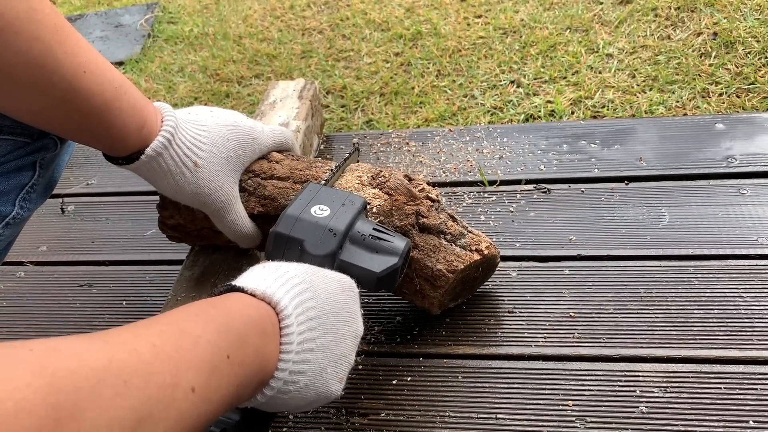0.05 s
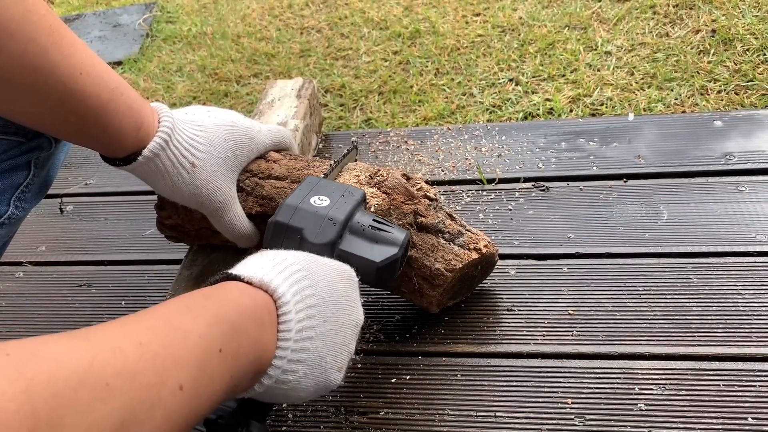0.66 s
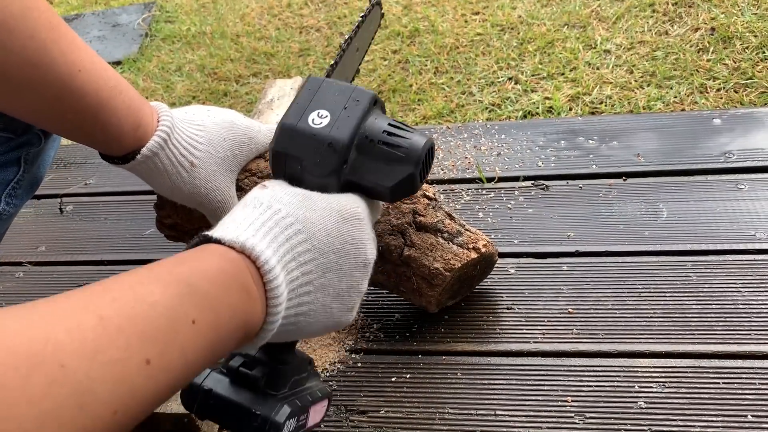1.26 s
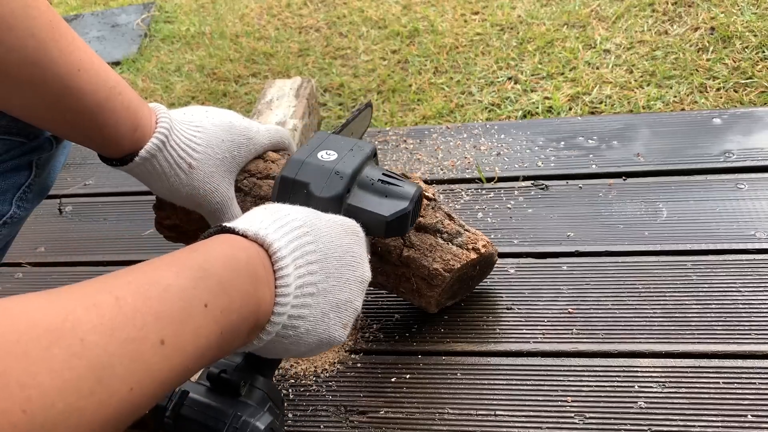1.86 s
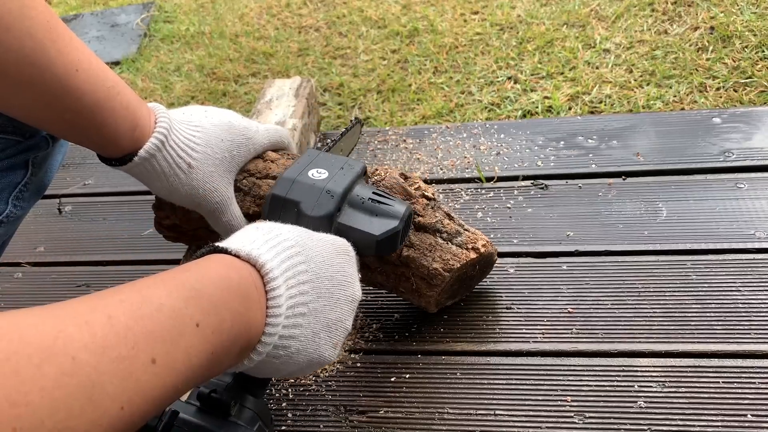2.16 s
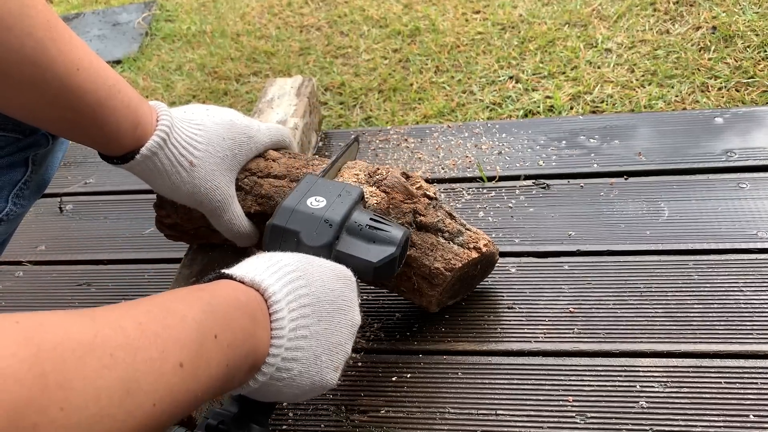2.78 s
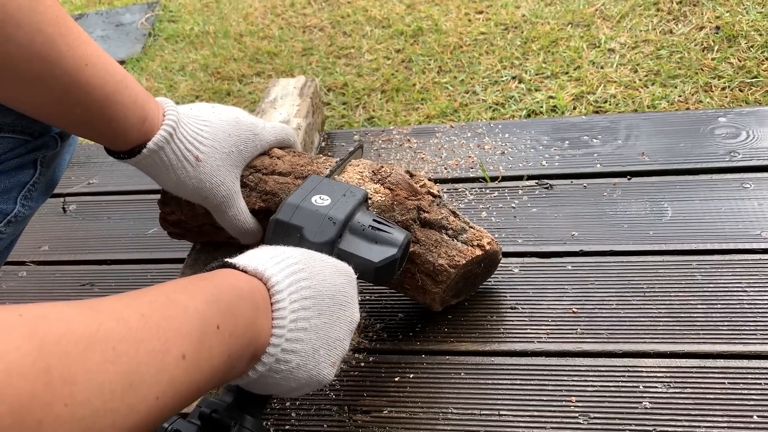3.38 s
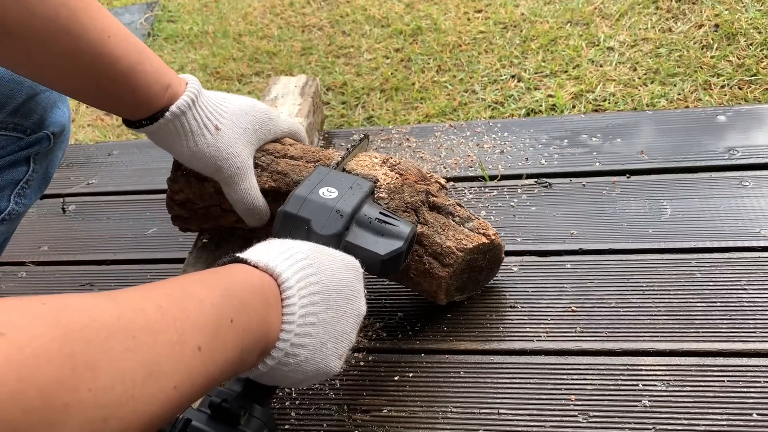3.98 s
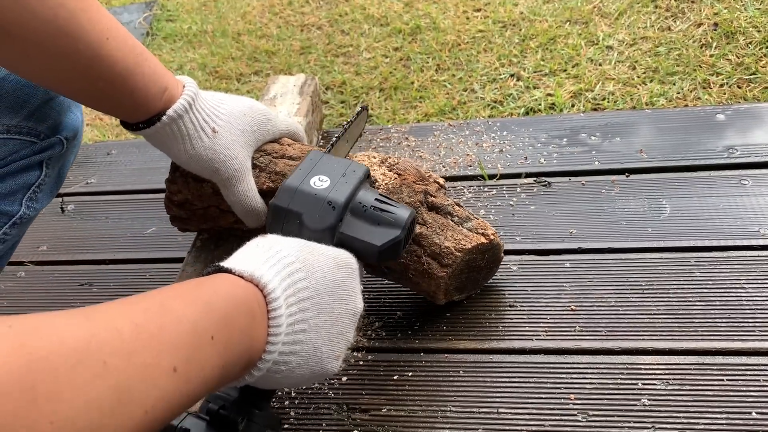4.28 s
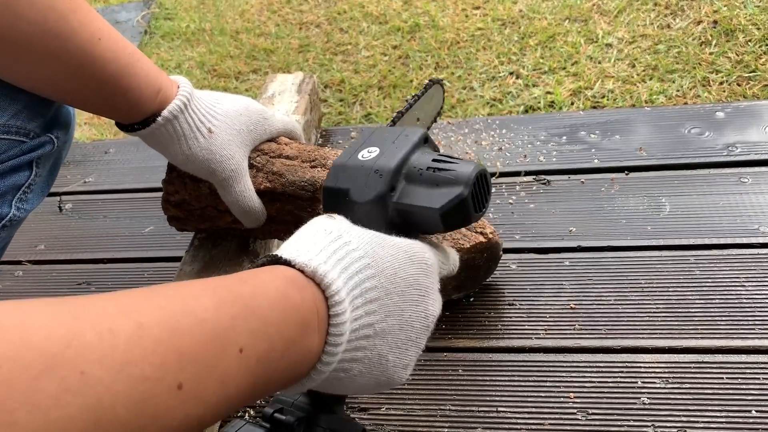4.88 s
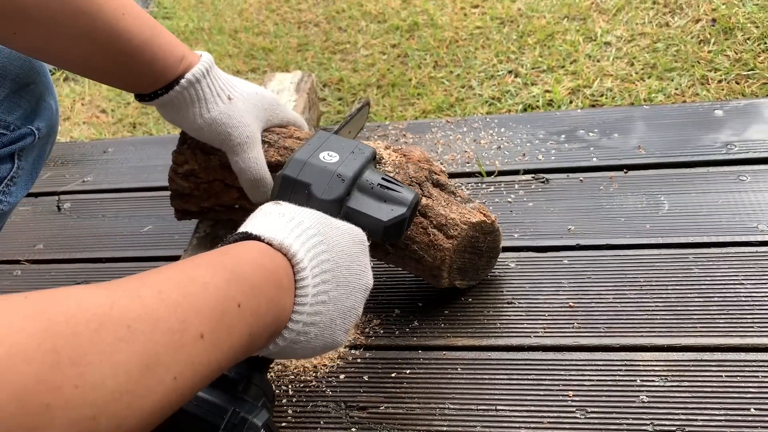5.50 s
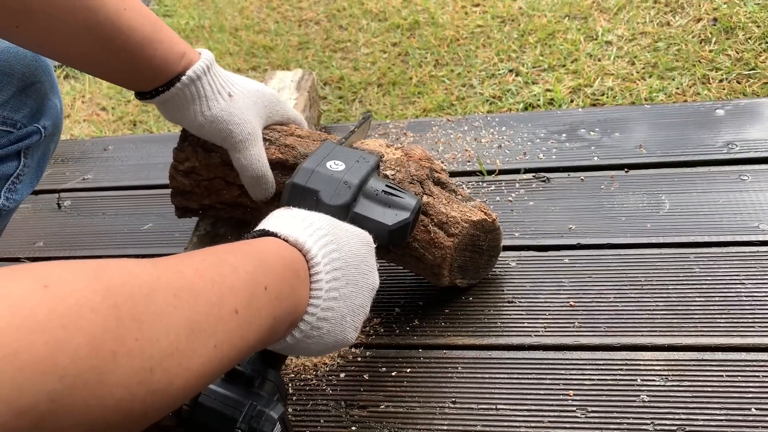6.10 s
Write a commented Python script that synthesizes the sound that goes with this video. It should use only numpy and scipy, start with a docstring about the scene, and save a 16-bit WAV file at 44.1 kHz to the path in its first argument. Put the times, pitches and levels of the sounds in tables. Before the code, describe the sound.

A small battery chainsaw whines and rattles through three short bursts against a log, with light ticks and knocks between.

```python
"""Light ticks and dull knocks come first: a stopped chain touches the bark, a log rocks on a wooden deck.
Then a small battery chainsaw runs in three short bursts. Its gears whine and the chain rattles round
the bar; when the cutters bite, the motor sags and the log drums. Between bursts, more ticks and scuffs.
Outdoors, close to the log, on a two-port stereo microphone, with a faint rumble far off."""
import sys
import numpy as np
from scipy import signal
from scipy.fft import rfft, irfft, next_fast_len
from scipy.io import wavfile
from scipy.ndimage import uniform_filter1d

SR = 44100
rng = np.random.default_rng(int(sys.argv[2]) if len(sys.argv) > 2 else 0)


def int16_out(signal):
    """Quantize to a 16-bit WAV file."""
    q = np.round(np.clip(np.atleast_2d(signal).T, -1, 1) * 32767)
    wavfile.write(sys.argv[1], SR, q.astype(np.int16))


N = 271038
T = np.arange(N) / SR

# trigger pulls: pull t/s, release t/s, drive level/dB, log contact level/dB, slack chain clack level/dB
BURSTS = [(1.516, 2.039, -2, -70.5, -35), (2.399, 3.921, 1, -40.5, -39), (5.377, 6.138, -0.5, -40.5, -31.5)]
# the drive's answer to each pull: spin-up time constant/s, gear whine trim/dB, chain ring trim/dB
SPIN_UPS = [(.067, .5, 1.5), (.096, -1, -3), (.078, 0, 1.5)]
# drag on the motor, one curve per burst: t/s, share of speed lost
MOTOR_DRAG = [
    [(1.72, 0), (1.8, .205), (1.825, .23), (1.865, .38), (1.915, .41), (2, .68), (2.035, .77)],
    [(2.85, .02), (2.91, .29), (3, .55), (3.09, .7), (3.13, .635), (3.2, .625), (3.32, .55), (3.42, .52),
     (3.5, .42), (3.55, .38), (3.6, .28), (3.73, .245), (3.86, .31), (3.93, .55)],
    [(5.75, 0), (5.86, .28), (5.99, .245), (6.05, .26), (6.085, .32), (6.14, .28)],
]
# cutters snag in the wood: t/s, crunch level/dB, snap level/dB, log jolt level/dB
SNAGS = [(2.855, -22, -26, -21.5), (2.867, -24.5, -31, -16.5), (2.9, -23.5, -38.5, -28),
         (3.602, -24, -40, -29.5), (3.761, -22, -28, -19), (3.802, -26.5, -40, -29.5),
         (3.823, -30, -35, -24.5), (3.853, -25.5, -47, -29), (3.872, -24, -40, -16.5),
         (3.901, -21.5, -46, -21), (3.921, -30, -46, -29.5), (5.409, -34.5, -39.5, -31),
         (5.778, -18.5, -25, -15), (5.811, -24.5, -28, -16.5), (5.84, -21.5, -28.5, -22),
         (5.872, -22.5, -55, -21), (5.931, -29, -41, -26.5), (5.955, -29.5, -53, -23),
         (6.003, -27, -48, -25), (6.047, -25, -59, -42), (6.114, -29, -44, -29)]
# dry links chirp in the groove: t/s, level/dB
CHIRPS = [(2.497, -30), (2.588, -30), (2.755, -35)]
# the stopped chain touches the bark, then the bar drops into the cut:
# t/s, click level/dB, bright edge level/dB, drop delay/s, hollow ring level/dB
TOUCHES = [(.005, -44.5, -57, .022, -49), (0.225, -44.5, -73, 0.018, -54), (.307, -45, -61, 0.027, -49),
           (.498, -45.5, -65, .018, -58), (.565, -44, -54.5, .022, -47.5), (.683, -56, -80, 0.0089, -76),
           (0.751, -62, -58, 0.015, -84), (0.777, -50, -68, 0.019, -67), (1.394, -51.5, -74, 0.01, -72),
           (2.127, -60, -70, 0.0088, -89), (2.268, -50, -61, 0.017, -82), (2.35, -43.5, -59, 0.0032, -45.5),
           (4.403, -45, -76, .023, -62), (4.534, -40.5, -78, 0.018, -69), (4.555, -48, -59, .027, -54),
           (4.749, -44.5, -80, 0.026, -71), (4.96, -49, -82, 0.0089, -71), (5.002, -58.5, -72, .01, -83)]
# the log rocks on the deck: t/s, level/dB, f/Hz, t60/s
KNOCKS = [(0.264, -37, 168, 0.12), (1.151, -40, 146, 0.093), (2.041, -45.5, 182, 0.11),
          (2.192, -39.5, 188.7, 0.035), (2.353, -29.5, 187, 0.043), (2.945, -23.5, 212, 0.07),
          (3.95, -37, 163, 0.14), (4.343, -42.5, 212, 0.093), (5.57, -29, 187.6, 0.059)]
# the bar scuffs along the cut: t/s, length/s, level/dB
SCUFFS = [(1.161, 0.032, -58.5), (1.239, 0.029, -75), (2.344, .045, -66.5), (4.26, 0.032, -60)]

# spectra and filter curves: f/Hz, level/dB
RATTLE_SPECTRUM = [(150, -33.5), (300, -12.5), (560, -4), (900, -6), (1250, -5.5), (1550, -5), (2300, -5),
                   (3200, 0.5), (4200, -4.5), (5200, -17), (7000, -15.5), (10000, -33.5)]  # links in the groove
HISS_SPECTRUM = [(2500, -30), (4500, -4), (5300, -3), (6300, -1), (7500, -1), (9500, 0), (13000, -.5),
                 (14700, -4), (15700, -9)]  # bright steel contacts
BITE_SPECTRUM = [(120, -4.5), (250, -6.5), (400, -3), (560, 2), (1200, -1), (1550, -5), (1950, -0.5),
                 (3000, -13), (5000, -21), (14000, -20)]  # tearing wood
TICK_SPECTRUM = [(300, -11.5), (700, 1.5), (1200, 1), (2000, -1), (3000, 5.5), (5000, -7), (9000, -20),
                 (15000, -40.5)]  # chain on bark
AIR_SPECTRUM = [(15, -23.5), (25, 3.5), (76, -4.5), (248, -18.5), (415, -28.5), (573, -33.5), (751, -37.5),
                (883, -35.5), (1640, -38.5), (2210, -39), (3600, -44.5), (6520, -51), (11500, -61),
                (13500, -56), (15900, -76.5)]  # outdoor background
GEAR_COVER = [(3600, 0), (4100, -1.5), (4450, -4.5), (5500, -16)]  # the cover muffles the highest whine
# resonances: f/Hz, width/Hz, level/dB
HOUSING_MODES = [(740, 40, -7.5), (910, 60, -5), (1233, 120, -6.5), (1975, 51, 0.5), (2360, 55, -4),
                 (2690, 160, -3), (3320, 270, -13)]
GEARBOX_MODES = [(1350, 400, -8), (2700, 550, 1), (3330, 400, .5), (3950, 700, -7)]
CHAIN_MODES = [(2775, 150, 1.5), (3640, 320, -10)]
CHIRP_MODES = [(5550, 350, 7), (6030, 500, -10)]
LOG_MODES = [(141.2, 23, -4.5), (175, 32, 1.5), (217.6, 35, 3), (262, 46, -14.5)]
# modes of the tapped bar: f/Hz, level/dB, t60/s
BAR_MODES = [(542.6, 9, 0.021), (647, -11, 0.024), (1140, -4, 0.017)]

# phase between the microphone ports: f/Hz, left lead/rad
PORT_PHASE = [(0, 0), (690, 1.17), (1890, 0.62), (3270, 3.5), (4130, 1.51), (6120, 4.5), (7240, 3.5),
              (8350, 0.5), (10300, 0.5), (11000, -3), (12200, -3.3), (12900, -6.5), (15000, -5.5),
              (15600, -9.5)]
# balance between the ports: f/Hz, left over right/dB
PORT_BALANCE = [(60, 0.5), (400, -2.5), (750, 1), (1250, 3), (1900, -3.5), (3300, -2.5), (5500, -3),
                (7000, 0), (15000, 0)]
# scattered sound, unlike in the two ports: f/Hz, share of power
SCATTER = [(100, .01), (300, .04), (700, 0.29), (2000, 0.38), (3200, 0.2), (4800, 0.9), (7000, 0.38),
           (9000, .04), (11000, .004), (12200, .004), (15000, .04)]

FREE_MESH_HZ, CREEP_MESH_HZ = 4463, 480  # gear teeth meshing: running free, at the first jerk
TEETH_PER_LINK = 48  # gear teeth that mesh while one chain link passes
BRAKE_S, ENGAGE_S = .025, .0073  # time constants: the motor stops, the chain starts to move
RATTLE_DB, RATTLE_DB_PER_OCTAVE = -39, 5  # base gain at free speed, change with speed
HISS_DB, HISS_DB_PER_OCTAVE = -33.5, 9
WHINE_LOAD_DB = 7  # extra whine at full load
SKIM_DB, LOWER_S = -8, .19  # drumming from skimming the bark, against full load; time to lower the bar


def saw():
    """The running saw, close by: chain, gears and cutters are all paced by the motor."""
    mesh_hz, rattle_gain, whine_gain, hiss_gain, cut_gain, ring_gain = motor()
    mesh_hz = mesh_hz * (1 + .005 * drift(45))
    teeth = np.cumsum(mesh_hz) / SR
    rattle, hiss = chain(teeth, mesh_hz)
    tearing, drumming = cutters(teeth)
    # the slack chain slaps the bar and rings in spurts; wood pressing on it damps the ring
    undamped = rattle_gain / (rattle_gain + from_db(8) * cut_gain + 1e-9)
    spurts = from_db(3.3 * drift(50))
    ring = undamped * spurts * even(resonate(grains(500, spread_db=2.5), CHAIN_MODES), window_s=.04)
    drive = from_db(3.5) * rattle_gain * rattle + ring_gain * ring + whine_gain * gears(teeth, mesh_hz)
    surge = from_db(.5 * drift(39.65))  # the slack chain whips, so the noise swells and fades
    cutting = from_db(-5) * tearing + from_db(-1) * drumming
    return surge * (drive + hiss_gain * hiss) + cut_gain * cutting


def motor(coast_t60=.11):
    """Pulls spin the motor up, load drags it down: mesh/Hz, then rattle, whine, hiss, cut, ring gains."""
    mesh_hz, gains = np.full(N, float(CREEP_MESH_HZ)), np.zeros((5, N))
    for burst, (spin_up_s, whine_db, ring_db), drag in zip(BURSTS, SPIN_UPS, MOTOR_DRAG):
        pull, release, db, contact_db, _ = burst
        held, coasting = np.clip(T - pull, 0, release - pull), np.maximum(T - release, 0)
        load = np.clip(np.interp(T, *np.transpose(drag)), 0, .9)
        spun = 1 - np.exp(-held / spin_up_s)
        hz = (CREEP_MESH_HZ + (FREE_MESH_HZ - CREEP_MESH_HZ) * spun) * (1 - load)
        mesh_hz += (hz - CREEP_MESH_HZ) * np.exp(-coasting / BRAKE_S) * (T > pull)
        octaves = np.log2(hz / FREE_MESH_HZ)
        rattle = from_db(db + RATTLE_DB + RATTLE_DB_PER_OCTAVE * octaves)
        whine = rattle * from_db(whine_db + WHINE_LOAD_DB * load)
        hiss = from_db(db + HISS_DB + HISS_DB_PER_OCTAVE * octaves)
        cut = from_db(contact_db) * (from_db(SKIM_DB) * np.clip(held / LOWER_S, 0, 1) ** 2 + load)
        running = (1 - np.exp(-held / ENGAGE_S)) * from_db(-60 * coasting / coast_t60)
        gains += running * np.array([rattle, whine, hiss, cut, rattle * from_db(ring_db)])
    return mesh_hz, *gains


def chain(teeth, mesh_hz, contacts_per_tooth=2.2):
    """Links clatter in the bar groove, harder each time one rounds the sprocket: (rattle, hiss)."""
    throb = from_db(1.7 * np.cos(2 * np.pi * teeth / TEETH_PER_LINK) + .9 * drift(150) + 1.5 * drift(700))
    per_s = contacts_per_tooth * mesh_hz + 1200
    clatter = colour(throb * grains(per_s, spread_db=3), RATTLE_SPECTRUM)
    # each panel of the housing buzzes more or less as the grip and load change
    buzz = sum(from_db(5.1 * drift(45)) * resonate(clatter, [mode]) for mode in HOUSING_MODES)
    hiss = colour(throb * grains(2 * per_s, spread_db=4.5), HISS_SPECTRUM)
    return even(clatter + buzz, window_s=.063), even(hiss, window_s=.051)


def gears(teeth, mesh_hz, rasp_db=-1.5, rasp_spread_hz=597.6):
    """Tooth mesh and its octave sing through the gearbox resonances; backlash rasps around the pitch."""
    phase = 2 * np.pi * teeth + .28 * drift(420) + .5 * drift(80)
    mesh = np.sin(phase) + from_db(-4) * np.sin(2 * phase)
    spurts = rms_one(from_db(2 * drift(55) + 2.2 * drift(240)))
    rasp = from_db(rasp_db) * drift(rasp_spread_hz) * np.sin(phase + drift(rasp_spread_hz))
    # the teeth press harder, and whine louder, while the motor gathers speed
    hz_per_s = uniform_filter1d(np.gradient(mesh_hz) * SR, SR // 20)
    torque = from_db(3.5 * np.clip(hz_per_s / 14000, 0, 1))
    return colour(resonate(mesh * spurts * torque + rasp, GEARBOX_MODES), GEAR_COVER)


def cutters(teeth, spread_db=3, kick_decay_s=.005):
    """Cutters catch unevenly; each tears off a chip and kicks the log: (tearing, drumming)."""
    link = np.floor(teeth / TEETH_PER_LINK + .6 * drift(160))
    kicks = (np.diff(link, prepend=0) != 0) * from_db(spread_db * np.clip(rng.standard_normal(N), -2, 2))
    force = signal.lfilter([1], [1, -np.exp(-1 / (kick_decay_s * SR))], kicks + 1e-18)
    tearing = colour(force * grains(5000, spread_db=5), BITE_SPECTRUM)
    drumming = resonate(force * rng.standard_normal(N), LOG_MODES)
    drumming = colour(drumming, [(60, -19.5), (130, 4.5), (270, 4), (450, -9.5), (900, -24.5)])
    return even(tearing, window_s=.045), even(drumming, window_s=.044)


def snags(jolt_hz=190, jolt_spread=.18):
    """A caught cutter splinters the wood with a crunch and a snap, and jolts the log at a varying pitch."""
    s, crunch_db, snap_db, jolt_db = np.transpose(SNAGS)
    splinters = even(colour(grains(9000, spread_db=1), BITE_SPECTRUM), window_s=.0035)
    crunch = blows(s, crunch_db, rise_s=.002, t60=.028) * splinters
    bright = rms_one(colour(grains(6900, spread_db=0), HISS_SPECTRUM))
    snap = blows(s - .002, snap_db, rise_s=.002, t60=.046) * bright
    pitches = jolt_hz * (1 + jolt_spread * rng.uniform(-1, 1, len(s)))
    jolt = sum(blows([at], [db], rise_s=.01, t60=.054) * np.sin(2 * np.pi * hz * (T - at))
               for at, db, hz in zip(s, jolt_db, pitches))
    return from_db(1.5) * crunch + from_db(3) * snap + jolt


def chirps():
    """Steel slips on steel and squeaks briefly."""
    squeak = even(resonate(rng.standard_normal(N), CHIRP_MODES), window_s=.0049)
    return blows(*np.transpose(CHIRPS), rise_s=.0018, t60=.053) * squeak


def knocks(upper_ratio=1.62, upper_db=-5):
    """The log thuds on the boards: one low mode and a shorter one above it."""
    out = np.zeros(N)
    for s, db, hz, t60 in KNOCKS:
        phase = 2 * np.pi * hz * (T - s)
        out += blows([s], [db], rise_s=.00091, t60=t60) * np.sin(phase)
        out += blows([s], [db + upper_db], rise_s=.0023, t60=.32 * t60) * np.sin(upper_ratio * phase)
    return out


def ticks():
    """A light touch of the chain: woody click, bright steel edge, hollow ring of the bar."""
    s, db, ring_db, edge_db = np.transpose(contacts())
    click = even(colour(grains(9800, spread_db=3.5), TICK_SPECTRUM), window_s=.0093)
    # bark gives way, so each contact swells over a moment
    contact = blows(s - .001, db, rise_s=.003, t60=.024)
    scrape = blows(s - .001, edge_db, rise_s=.002, t60=.024)
    woody = click * (from_db(-2) * contact + from_db(-23.5) * blows(s, db, rise_s=.01, t60=.2))
    edge = from_db(5) * scrape * rms_one(colour(grains(9000, spread_db=13), HISS_SPECTRUM))
    taps = np.zeros(N)
    taps[(np.abs(s) * SR).astype(int)] = from_db(ring_db)
    age = T[:SR // 5]
    bar = sum(from_db(level - 60 * age / t60) * np.sin(2 * np.pi * hz * age)
              for hz, level, t60 in BAR_MODES)
    ring = signal.fftconvolve(taps, bar * (1 - np.exp(-age / .0012)))[:N]
    return woody + edge + from_db(3.5) * ring


def contacts(ring_offset_db=-25.5):
    """Each touch and its softer drop, and a clack for each pull: t/s, click/dB, ring/dB, edge/dB."""
    first = [(s, db, db + ring_offset_db, edge_db) for s, db, edge_db, _, _ in TOUCHES]
    drops = [(s + delay, db - 5, ring_db, edge_db - 7) for s, db, edge_db, delay, ring_db in TOUCHES]
    clacks = [(pull, db, db + ring_offset_db, db - 14.5) for pull, *_, db in BURSTS]
    return first + drops + clacks


def scuffs(touch_drag_s=.02, touch_drag_db=-32.5):
    """Steel drags briefly over bark grains; every touch drags a little too."""
    drags = [(s, touch_drag_s, db + touch_drag_db) for s, db, *_ in TOUCHES]
    swell = sum(from_db(db) * np.exp(-2 * ((T - s) / length) ** 2) for s, length, db in SCUFFS + drags)
    bark = colour(grains(2500, spread_db=10.5), [(300, 3.5), (900, 2), (3000, 3), (7000, 0), (14000, -1.5)])
    return swell * rms_one(bark)


def deck(x, scatter_t60=.039):
    """Direct sound meets the microphone ports out of step; boards, log and hands scatter the rest."""
    age = T[:SR // 10]
    echoes = rng.standard_normal(len(age)) * from_db(-60 * age / scatter_t60)
    size = next_fast_len(N + SR // 5)
    hz = np.arange(size // 2 + 1) * SR / size
    scattered = signal.hilbert(signal.fftconvolve(x, echoes / np.linalg.norm(echoes)), size)[:N]
    shifting = np.real(scattered * np.exp(2j * drift(90)))  # moving hands shift the paths
    share = np.clip(np.interp(hz, *np.transpose(SCATTER)), 0, 1) / 2
    mid, side = np.sqrt(1 - share) * rfft(x, size), np.sqrt(share) * rfft(shifting, size)
    balance = from_db(np.interp(hz, *np.transpose(PORT_BALANCE)) / 2)
    lead = balance * np.exp(.5j * np.interp(hz, *np.transpose(PORT_PHASE)))
    return irfft([(mid + side) * lead, (mid - side) / lead], size)[:, :N]


def air(mid_db=-60.5):
    """Quiet open air: a far rumble, alike in both channels, under faint diffuse hiss."""
    mid, side = colour(rng.standard_normal((2, N)), AIR_SPECTRUM)
    side = colour(side, [(60, -15.5), (250, -10.5), (1000, 2.5), (5000, -.5)])
    return from_db(mid_db) * (mid + side * [[1], [-1]]) / np.std(mid)


def from_db(db):
    """Decibels to gain."""
    return 10 ** (np.asarray(db) / 20)


def rms_one(x):
    """Scale to unit rms."""
    return x / np.sqrt(np.mean(x ** 2) + 1e-20)


def drift(hz):
    """A random wander of rms 1 that turns about hz times a second."""
    knots = rng.standard_normal(20000)
    return rms_one(np.interp(T * hz, np.arange(len(knots)), knots))


def colour(x, spectrum):
    """Causal (minimum-phase) filter from rows of f/Hz, level/dB."""
    size = 2 * next_fast_len(N // 2 + 4096)
    hz, db = np.transpose(spectrum)
    grid = np.arange(size // 2 + 1) * SR / size
    gain = from_db(np.interp(np.log(grid + 1), np.log(hz + 1), db))
    cepstrum = irfft(np.log(gain))
    cepstrum[1:size // 2] *= 2
    cepstrum[size // 2 + 1:] = 0
    return irfft(rfft(x, size) * np.exp(rfft(cepstrum)))[..., :N]


def resonate(x, modes):
    """Parallel resonances from rows of f/Hz, width/Hz, level/dB."""
    out = 0
    for hz, width, db in modes:
        r = np.exp(-np.pi * width / SR)
        feedback = [1, -2 * r * np.cos(2 * np.pi * hz / SR), r * r]
        out = out + from_db(db) * (1 - r * r) / 2 * signal.lfilter([1, 0, -1], feedback, x + 1e-18)
    return out


def grains(per_s, spread_db):
    """Tiny contacts at random moments, of uneven size; rms 1."""
    impulses = (rng.random(N) < per_s / SR) * rng.choice([-1, 1], N)
    return rms_one(impulses * from_db(spread_db * np.clip(rng.standard_normal(N), -2, 2)))


def even(x, window_s):
    """Hold the slow level at rms 1 and keep the fast grain."""
    power = np.abs(uniform_filter1d(x ** 2, max(int(window_s * SR), 2)))
    return x / np.sqrt(power + 1e-6 * np.mean(x ** 2))


def blows(times, levels_db, rise_s, t60):
    """Envelope of hits that swell quickly and die away."""
    out = np.zeros(N)
    for s, db in zip(times, levels_db):
        start = max(int(s * SR), 0)
        age = T[:min(N - start, SR // 3)]
        out[start:start + len(age)] += from_db(db - 60 * age / t60) * (1 - np.exp(-age / rise_s))
    return out


def scene():
    """Saw, log and handling close by on the deck, with open air behind."""
    return deck(saw() + snags() + ticks() + scuffs() + knocks() + chirps()) + air()


def record(dry, low_cut_hz=41, high_cut_hz=15700):
    """The microphone's deepest rumble and very top are cut."""
    dry = signal.sosfilt(signal.butter(6, low_cut_hz, "high", fs=SR, output="sos"), dry)
    return signal.sosfilt(signal.ellip(10, .1, 80, high_cut_hz, fs=SR, output="sos"), dry)


dry = scene()
out = record(dry)
int16_out(out)
```